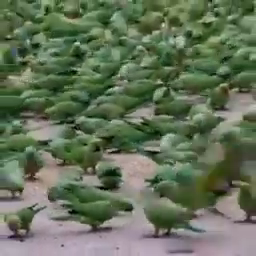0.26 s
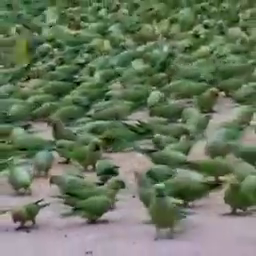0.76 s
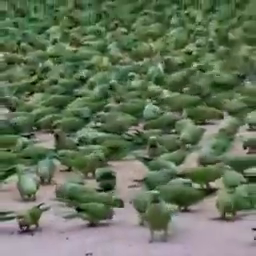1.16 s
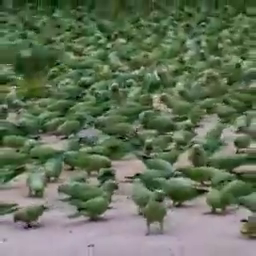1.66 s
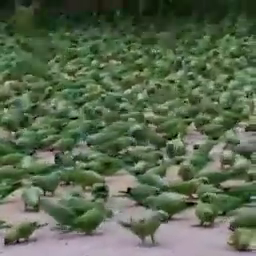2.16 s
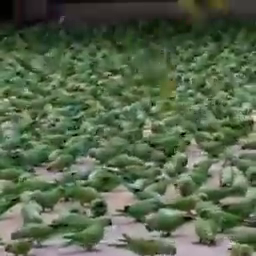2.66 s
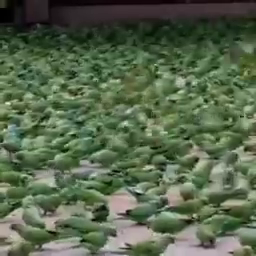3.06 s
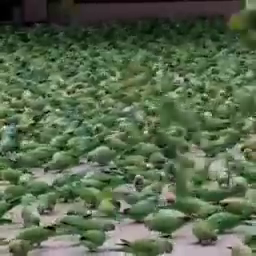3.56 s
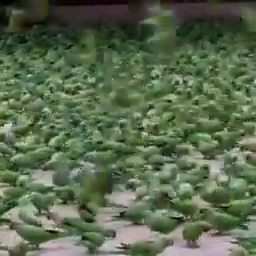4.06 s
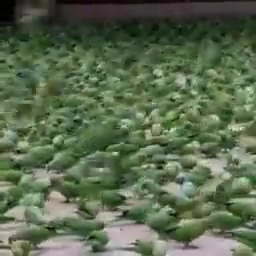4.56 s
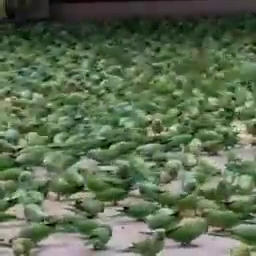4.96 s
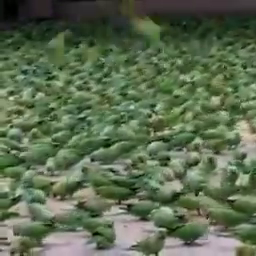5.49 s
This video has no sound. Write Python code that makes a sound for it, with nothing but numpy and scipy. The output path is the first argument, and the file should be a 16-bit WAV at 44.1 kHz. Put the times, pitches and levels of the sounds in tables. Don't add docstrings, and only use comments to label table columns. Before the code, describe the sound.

Dense overlapping parakeet screeches surge outdoors, loud warbled squawks close on the left at first, then gradually thinning, with soft wing thumps.

```python
import sys
import numpy as np
from scipy import signal
from scipy.fft import rfft, irfft, next_fast_len
from scipy.io import wavfile
from scipy.ndimage import uniform_filter1d

SR = 44100
rng = np.random.default_rng(int(sys.argv[2]) if len(sys.argv) > 2 else 0)


def rack_gain(trim_db):
    fader = np.asarray(trim_db, float)
    return 10 ** (fader / 20)


def file_out(sig):
    cols = np.atleast_2d(sig).T
    lim = np.clip(cols, -1, 1)
    pcm = np.round(lim * 32767).astype(np.int16)
    wavfile.write(sys.argv[1], SR, pcm)


N = 252693
T = np.arange(N) / SR
OPPOSITE = np.array([[1], [-1]])


def curve(table):
    s, *columns = np.transpose(table)
    return [np.interp(T, s, c) for c in columns]


def colour(x, tone):
    size = next_fast_len(N)
    hz, db = np.transpose(tone)
    bin_hz = np.arange(size // 2 + 1) * SR / size
    gain = rack_gain(np.interp(np.log(bin_hz + 1), np.log(hz), db))
    return irfft(rfft(x, size) * gain, size)[..., :N]


def unit(x):
    return x / np.sqrt(np.mean(x ** 2))


def walk(rate_hz, size=N):
    k = max(int(SR / rate_hz), 2)
    smooth = uniform_filter1d(rng.standard_normal(size), k)
    return unit(uniform_filter1d(smooth, k))


def swells(s, hold_s, db, rise_s, fall_s):
    s, hold_s, db = s[:, None], hold_s[:, None], db[:, None]
    before, after = (s - T) / rise_s, (T - s - hold_s) / fall_s
    away = np.maximum(0, np.maximum(before, after))
    return rack_gain(db - 10 * away) ** 2 + 1e-18


def add(out, x, start, side, pan_db):
    lag = 5
    for port, sign in enumerate((1, -1)):
        i = max(start + int(round(lag * max(-sign * side, 0))), 0)
        out[port, i:i + len(x)] += x[:max(N - i, 0)] * rack_gain(sign * pan_db / 2)


def walls(x, t60_s, wet_db):
    u = np.arange(int(.4 * SR)) / SR
    decay = np.exp(-np.log(1000) * u / t60_s)
    tail = rng.standard_normal((2, len(u))) * decay * np.clip(u / 0.0041, 0, 1)
    tail /= np.sqrt(np.sum(tail ** 2, axis=1, keepdims=True))
    return x + rack_gain(wet_db) * signal.fftconvolve(x, tail, axes=1)[:, :N]


def turbulence():
    return np.array([walk(1490), walk(2500), walk(57), rng.standard_normal(N)])


MEMBRANE_DB = [0.5, 1, -10, -9.5, -10]


def syrinx(hz, warble_hz, depth, rough, flutter):
    pitch_chance, level_chance, speed_chance, hiss = flutter
    turn = 2 * np.pi * np.cumsum(warble_hz * (1 + 0.0766 * speed_chance)) / SR
    swing = -np.cos(turn) - 0.27 * np.sin(2 * turn)
    pitch = hz * (1 + depth * swing + .07 * rough ** 2 * pitch_chance)
    phase = 2 * np.pi * np.cumsum(pitch) / SR
    tone = 0
    for k, db in enumerate(MEMBRANE_DB, 1):
        tone = tone + rack_gain(db) * np.sin(k * phase) * (k * pitch < .36 * SR)
    tone = tone + .5 * rough * hiss
    throb = 1 + (1.9 * depth + .5 * rough) * np.cos(turn - .8)
    return tone * throb * (1 + 0.58 * rough * level_chance)


CALL_STYLES = {"whistle": (110, .008, .2), "pipe": (95, .025, .35), "rasp": (100, .05, .75),
               "warble": (108, .13, .25), "trill": (120, .15, .3), "churr": (82, .19, .3),
               "rattle": (65, .12, .45)}
BIRD_SIDES = {"left": 1, "ahead": 0, "right": -1}
# side, start in seconds, length in seconds, first and last pitch in Hz, peak in dB
CLEAR_NOTES = [("left", .325, .035, 2310, 2200, -31), ("left", .528, 0.0161, 2400, 3350, -28),
               ("left", .762, .026, 2000, 2620, -23.5), ("left", .986, .017, 2300, 3200, -24),
               ("ahead", 2.028, 0.019, 3550, 3600, -32), ("right", 2.225, .037, 4930, 4900, -42),
               ("left", 3.292, .024, 2560, 2780, -30), ("left", 3.542, 0.0213, 2720, 2930, -28),
               ("right", 3.725, 0.046, 2000, 2120, -37.5), ("left", 4.703, .057, 1590, 1400, -39.5),
               ("left", 5.255, .075, 1950, 2030, -47), ("left", 3.51, .028, 2280, 2300, -44)]
# side, start and length in seconds, first and last pitch in Hz, peak in dB
HOARSE_NOTES = [("left", .165, .06, 3120, 2400, -37), ("left", .34, .09, 3100, 2350, -36),
                ("right", .875, .045, 2020, 1800, -35), ("left", 1.002, .055, 3120, 2150, -27),
                ("left", 1.03, .04, 3950, 3650, -30), ("right", 1.075, .03, 2400, 2100, -33),
                ("ahead", 1.28, 0.033, 1950, 1970, -45.5), ("ahead", 1.667, .03, 4220, 4100, -38.5),
                ("right", 1.745, .07, 4770, 4850, -36.5), ("ahead", 2.07, .03, 3460, 3240, -38.5),
                ("right", 2.212, .085, 4400, 4250, -38), ("ahead", 3.66, .08, 1580, 1250, -43),
                ("left", 3.345, .03, 2400, 2000, -37), ("left", 3.6, .045, 2300, 2000, -36),
                ("left", 4.09, .06, 4150, 4250, -40.5), ("ahead", 4.49, .05, 1560, 1460, -45.5),
                ("left", 4.63, .06, 3900, 3450, -42), ("left", 4.705, .055, 4720, 4350, -47),
                ("left", 5.465, 0.073, 2410, 2300, -52)]
# way of calling, side, start in seconds, length in seconds,
# first and last pitch in Hz, peak in dB
HARSH_NOTES = [("rasp", "left", .368, 0.061, 2290, 2000, -39), ("rasp", "left", .475, .03, 1500, 1150, -38),
               ("trill", "left", .558, 0.0805, 3000, 2930, -26),
               ("warble", "left", .785, .07, 2660, 2150, -24), ("rasp", "left", 2.6, .025, 2030, 2030, -41),
               ("rasp", "right", 2.945, .12, 3780, 3880, -37),
               ("rasp", "right", 3.02, .18, 2800, 3270, -41.5),
               ("churr", "left", 3.313, .037, 2670, 2640, -30),
               ("churr", "left", 3.566, .042, 2930, 2500, -29),
               ("rasp", "ahead", 3.99, .05, 3340, 3280, -48),
               ("rasp", "ahead", 4.597, .038, 3240, 3100, -41.5),
               ("rattle", "ahead", 4.745, 0.073, 2500, 2500, -47),
               ("rattle", "ahead", 5.02, 0.063, 2300, 2280, -45),
               ("rasp", "left", 5.26, 0.098, 2700, 2700, -49.5),
               ("rasp", "left", 5.5, .08, 2950, 2500, -49.5)]
# pitch in Hz, level in dB
NEAR_THROAT = [(1200, -3), (2000, -12.5), (3000, -7.5), (4000, 1.5), (5200, 8.5), (6300, 2), (7300, -16.5),
               (8500, -7), (9800, -14.5), (12000, -5), (14500, -32)]


def squawks():
    out, air = np.zeros((2, N)), turbulence()
    notes = [("whistle", *row) for row in CLEAR_NOTES]
    notes += [("pipe", *row) for row in HOARSE_NOTES] + list(HARSH_NOTES)
    for voice, side_name, s, long, first_hz, last_hz, db in notes:
        side = BIRD_SIDES[side_name]
        span = slice(int(s * SR), min(int((s + long) * SR), N))
        u = np.clip((T[span] - s) / long, 0, 1)
        edge = np.clip(np.minimum(u, 1 - u) * long / 0.0018, 0, 1)
        if last_hz > first_hz * 1.03:
            peak, start_db, end_db, bend = .5, -9.5, -4, 0.8
        else:
            peak, start_db, end_db, bend = 0.28, -4, -6.5, 2.8
        pitch = first_hz + (last_hz - first_hz) * u ** bend
        effort = rack_gain(db + np.interp(u, [0, peak, 1], [start_db, 0, end_db]) + 2.5)
        note = syrinx(pitch, *CALL_STYLES[voice], air[:, span]) * edge * effort
        add(out, note, span.start, side, 1.0 + 2.4 * side)
    return colour(out, NEAR_THROAT)


# start in seconds, number of chips, peak in dB
CHIP_RUNS = [
    (1.474, 3, -38),
    (2.6, 3, -40),
    (4.36, 3, -39),
    (4.842, 2, -42),
    (5.371, 3, -44),
]


def chips():
    gap_s = .0235
    out, u = np.zeros((2, N)), np.linspace(0, 1, int(0.013 * SR))
    chip = np.sin(2 * np.pi * np.cumsum(7900 - 1700 * u) / SR) * np.sin(np.pi * u)
    for s, count, db in CHIP_RUNS:
        for k in range(count):
            add(out, chip * rack_gain(db - 2 * (k == 0)), int((s + k * gap_s) * SR), .6, 1.5)
    return out


# pitch in Hz, level in dB
DISTANT_THROAT = [(1200, -13), (2000, -13.5), (3000, -3.5), (4000, -0.5), (5200, 3.5), (6300, 2.5),
                  (7500, -1.5), (9500, -4), (12000, -9), (14500, -25)]


def far_calls(count=340):
    rough, spread_db = .62, 9
    out, air = np.zeros((2, N)), turbulence()
    for k, (when, long, high, warble, near, side, where) in enumerate(rng.random((count, 7))):
        u = np.linspace(0, 1, int((.06 + .1 * long) * SR))
        arch = 1 - .25 * (2 * u ** .7 - 1) ** 2
        pitch = (1900 + 2200 * high ** 1.5) * arch
        i = int(where * (N - len(u)))
        call = syrinx(pitch, 90 + 50 * warble, .17 * warble, rough, air[:, i:i + len(u)])
        call = call * np.sin(np.pi * u) ** 0.66 * rack_gain(-spread_db * near)
        start = int((k + when) / count * N) - 2000
        add(out, call, start, np.clip(2.4 * side - 1.1, -1, 1), 0)
    return colour(out, DISTANT_THROAT)


# start in seconds, hold in seconds, level in dB, overtones in dB
FLOCK_SURGES = [(0.0, 0.011, -25.5, -8), (0.063, .06, -35, -11), (0.152, 0.079, -31, -10.5),
                (.33, .09, -29, -9), (0.478, 0.17, -26.5, -9), (0.774, .15, -27, -5.5),
                (.99, 0.084, -25, -8), (1.22, 0.098, -35, -10), (1.523, 0.066, -28.5, -7),
                (1.672, 0.16, -31, -8.5), (1.911, 0.093, -31, -6), (2.058, 0.14, -35, -9),
                (2.22, .12, -32.5, -5.5), (2.407, .14, -33.5, -9), (2.638, 0.1, -37, -9),
                (2.966, 0.046, -32.5, -9), (3.026, 0.13, -27, -10.5), (3.25, .04, -35, -9),
                (3.31, 0.047, -30.5, -9), (3.41, .08, -40.5, -9), (3.567, 0.16, -28.5, -9),
                (3.807, 0.11, -29.5, -8.5), (3.983, .05, -36, -6), (4.086, .13, -35, -10),
                (4.331, 0.16, -33.5, -9.5), (4.598, 0.25, -34, -9.5), (4.993, .1, -33, -11),
                (5.253, 0.13, -40, -9.5), (5.492, 0.093, -40.5, -6.5)]
# time in seconds, left minus right in dB
FLOCK_BEARING = [(0, 1), (.35, -3), (.6, 2), (1.05, 2.5), (1.5, -2.5), (2.5, -1.5), (2.65, 3), (3.0, -2.5),
                 (3.5, 0.5), (3.9, -1), (4.2, .5), (5.73, -0.5)]


def flock():
    s, hold_s, db, bright_db = np.transpose(FLOCK_SURGES)
    power = swells(s, hold_s, db, rise_s=0.026, fall_s=.07)
    total = power.sum(axis=0)
    high_db = bright_db @ power / total
    pan_db = curve(FLOCK_BEARING)[0]
    far = walls(far_calls(), t60_s=0.22, wet_db=-3.0)
    loudness = uniform_filter1d(np.mean(far ** 2, axis=0), int(0.056 * SR))
    far = far / np.sqrt(np.abs(loudness) + 1e-9)
    high = colour(far, [(6200, -29), (7800, -1.5)])
    far = far + high * (rack_gain(high_db + 12.5) - 1)
    return far * np.sqrt(total) * rack_gain(-5.5 + np.array([pan_db, -pan_db]) / 2)


# start in seconds, peak in dB, pitch in Hz
WING_BEATS = [(0.06, -44, 59.2), (0.733, -35, 80), (0.926, -48, 94.2), (1.031, -38, 52), (1.135, -37, 70.0),
              (1.26, -36, 81), (1.317, -40, 101), (1.402, -41, 56.5), (1.504, -45, 70.0),
              (1.714, -42.5, 67.3), (1.931, -40, 70.0), (1.963, -35.5, 75.4), (2.017, -36.5, 79),
              (2.202, -43.5, 129), (2.2, -36.5, 65.5), (2.309, -36.5, 69.5), (2.572, -44, 96),
              (3.107, -37, 76.5), (3.231, -47, 79), (3.294, -44.5, 65), (3.533, -42, 69.5),
              (3.732, -39, 76), (3.877, -47, 102), (3.997, -43.5, 53), (4.147, -50, 75.4),
              (4.173, -46, 72.7), (4.308, -43, 51.1), (4.307, -36.5, 65.4), (4.405, -43, 94.2),
              (5.292, -47, 113)]


def wings():
    out, u = np.zeros((2, N)), np.arange(int(.06 * SR)) / SR
    for (s, db, hz), side in zip(WING_BEATS, rng.uniform(-1.26, 1, len(WING_BEATS))):
        stroke_s = u + 0.0048 * (1 - np.exp(-u / 0.0024))
        puff = np.sin(2 * np.pi * hz * stroke_s) * u / 0.009 * np.exp(1 - u / 0.01)
        add(out, puff * rack_gain(db - 7), int(s * SR), side, 13.0 * side)
    return out


# start in seconds, hold in seconds, level in dB
WING_GUSTS = [(0.036, .6, -53), (0.742, .03, -41), (.9, 0.21, -51), (1.253, .1, -41.5), (1.6, .25, -51),
              (1.932, .06, -40.5), (2.2, 0.16, -44.5), (2.45, 0.29, -55), (3.1, .04, -39.5),
              (3.25, .06, -43.5), (3.4, .7, -54), (4.27, 0.066, -46.5), (4.4, .28, -54.5), (5.0, .12, -59),
              (5.298, .03, -55)]
# pitch in Hz, level in dB per Hz
AIR_TONE = [(12, -39), (20, -4), (76, 1), (268, -11.5), (344, -17), (400, -27), (520, -57), (880, -120)]


def draught():
    mid, side = unit(colour(rng.standard_normal((2, N)), AIR_TONE))
    power = swells(*np.transpose(WING_GUSTS), rise_s=0.028, fall_s=0.071).sum(axis=0)
    gust = np.sqrt(power + rack_gain(-69.5) ** 2)
    return (mid + 0.43 * side * OPPOSITE) * gust * rack_gain(-5.5 + 4.0 * walk(25))


# time in seconds, level in dB
YARD_LEVEL = [
    (0, -51),
    (.5, -50.5),
    (3.64, -51),
    (4.99, -55.5),
    (5.45, -60),
    (5.73, -60.5),
]
# pitch in Hz, level in dB per Hz
YARD_COLOUR = [(12, -34), (20, -0.5), (60, -3), (239, -11.5), (332, -4), (503, -8), (681, -1.5),
               (1840, -4.5), (3010, -2.5), (6000, -3.5), (8130, -12.5), (12000, -18), (13300, -21),
               (14500, -61)]


def yard():
    mid, side = rng.standard_normal((2, N))
    side = colour(side, [(100, -11), (600, -21.5), (1400, -10.5), (2500, 0.5)])
    bed = colour(mid + side * OPPOSITE, YARD_COLOUR)
    return unit(bed) * rack_gain(curve(YARD_LEVEL)[0] + 10.5 + 0.29 * walk(18))


def scene():
    near = walls(squawks() + chips(), t60_s=0.13, wet_db=-8.0)
    return near + flock() + wings() + draught() + yard()


def low_pass(x):
    return signal.sosfilt(signal.butter(12, 14710, fs=SR, output="sos"), x)


def record(dry):
    return low_pass(dry)


dry = scene()
out = record(dry)
file_out(out)
```